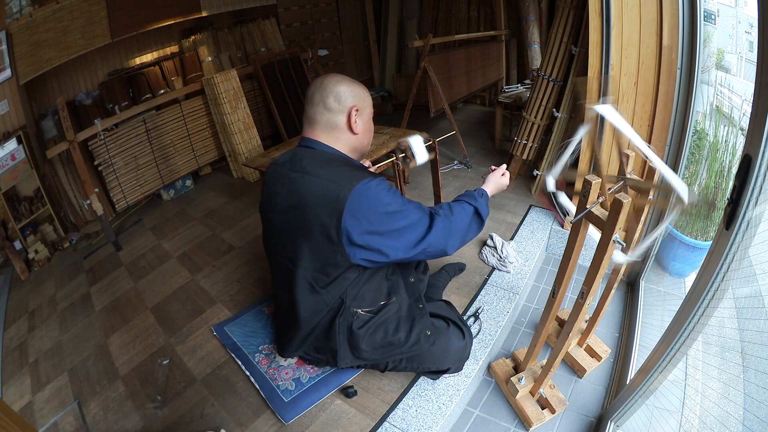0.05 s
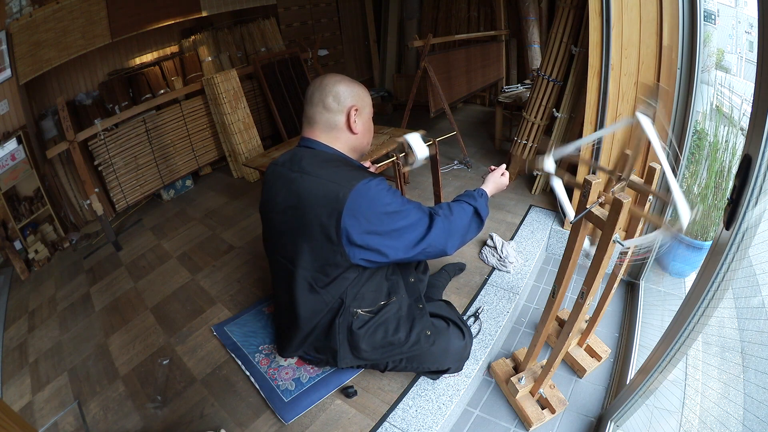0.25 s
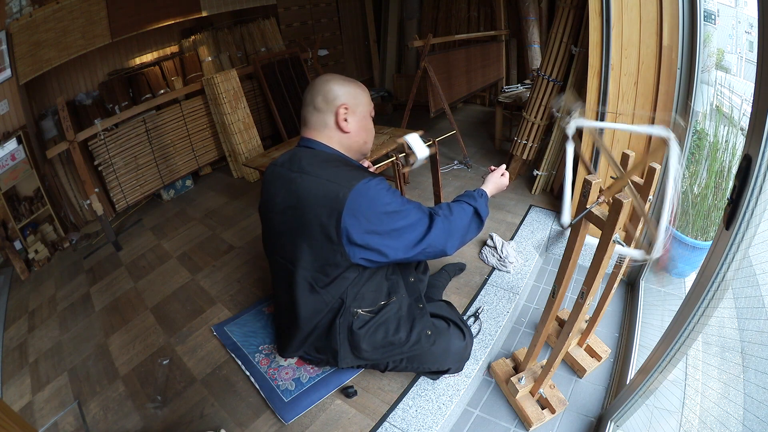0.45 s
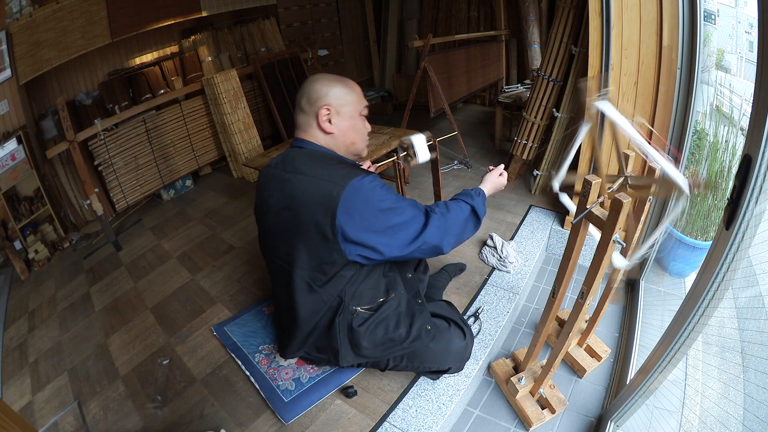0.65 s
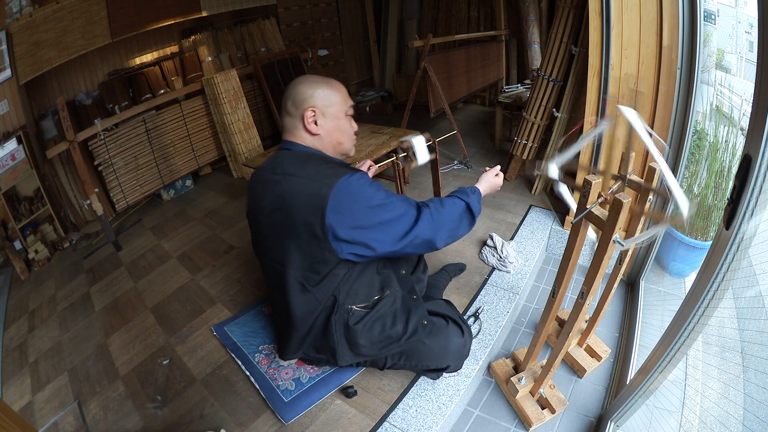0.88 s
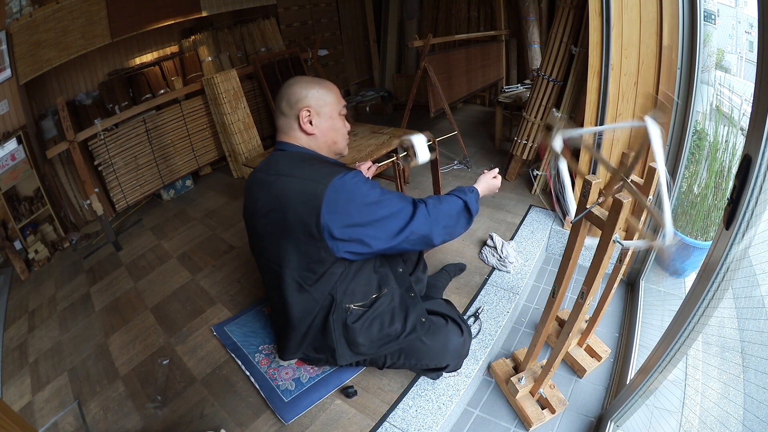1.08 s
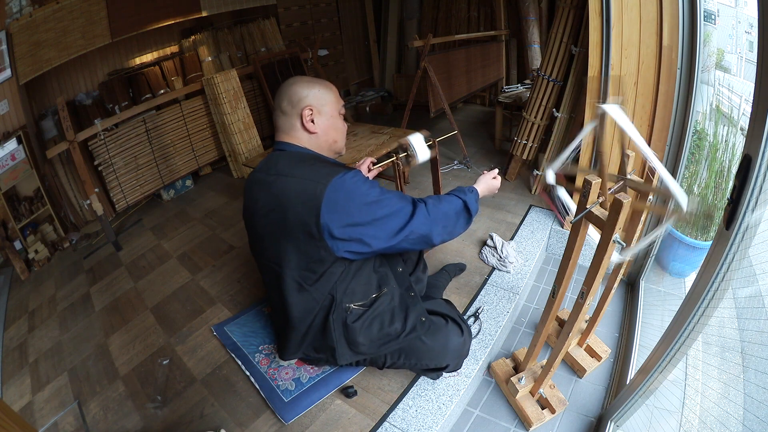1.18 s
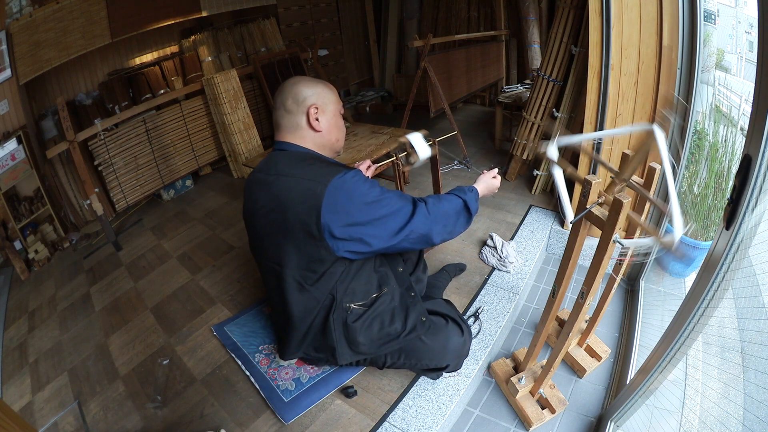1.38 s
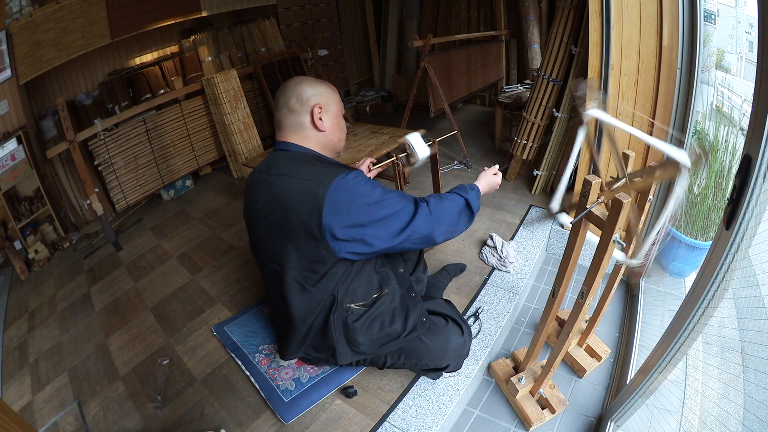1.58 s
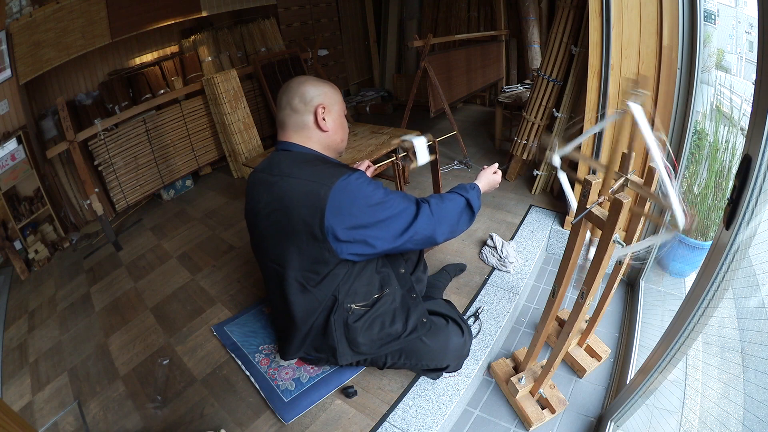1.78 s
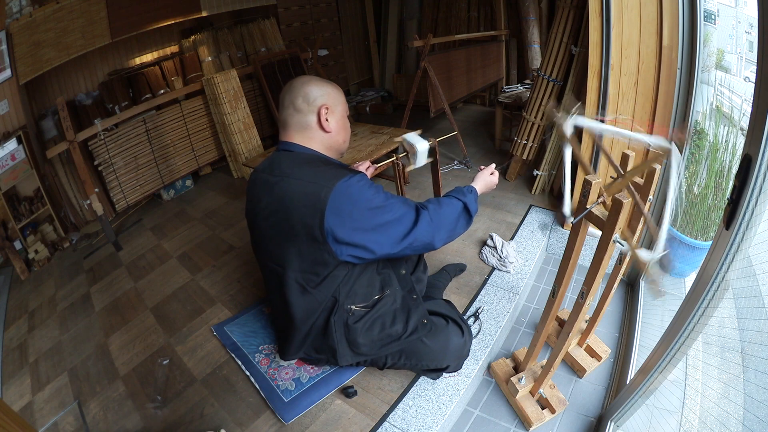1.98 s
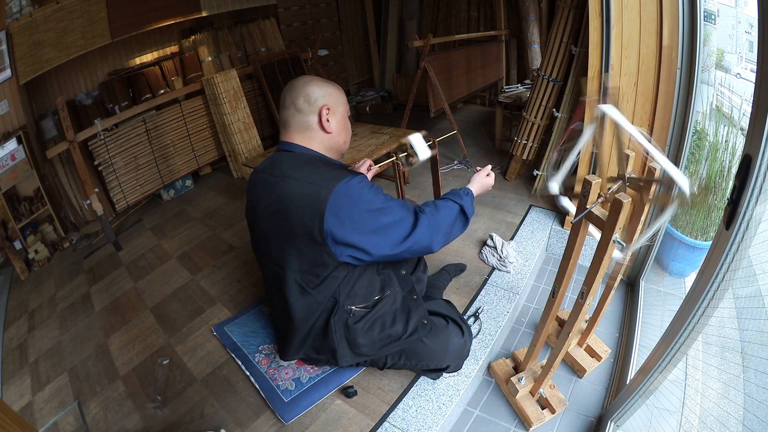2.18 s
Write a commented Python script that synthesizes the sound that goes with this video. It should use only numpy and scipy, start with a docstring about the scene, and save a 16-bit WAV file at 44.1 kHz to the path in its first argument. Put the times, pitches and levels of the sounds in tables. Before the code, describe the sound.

A wooden reel turns on its stand, its loose axle making dull, uneven clacks about four times a second for just over two seconds. A bright click at 0.2 seconds is the loudest sound. Tiny wood squeaks join the clacks near 0.5 and 0.7 seconds. Sliding thread hisses faintly, most from 0.5 to 1 second, over the low rumble and faint drone of a small, quiet workshop.

```python
"""Dull wooden clacks, about four a second, and two bright clicks: a reel turning on its stand.
The loose axle drops in its bearing and rings the stand; harder contacts ring the reel itself.
Dry wood slips with brief squeaks, and the thread hisses faintly as it is wound off.
Behind them lie a faint drone and the low rumble of a quiet workshop."""
import sys
import numpy as np
from scipy import signal
from scipy.fft import rfft, irfft
from scipy.io import wavfile
from scipy.ndimage import uniform_filter1d

SR = 44100
rng = np.random.default_rng(int(sys.argv[2]) if len(sys.argv) > 2 else 0)


def output_pcm(signal):
    """Save a mono or channel-first signal as 16-bit PCM at the path in sys.argv[1].

    Samples are clipped to [-1, 1] before scaling.
    """
    pcm = np.clip(np.atleast_2d(signal).T, -1, 1) * 32767
    wavfile.write(sys.argv[1], SR, np.round(pcm).astype(np.int16))


N = 99225

# stereo likeness of hiss and rumble (frequency [Hz], left-right correlation [-])
NOISE_CORRELATION = [(30, 0.98), (140, 1), (300, 0.89), (600, 0.67), (1500, 0.43), (4000, 0.64),
                     (12000, 0.79)]


def axle_clacks(level_db=-18, t60_s=0.015):
    """The axle drops or rolls over in its bearing with a quick, dull rattle that rings the stand."""
    # (time [s], level [dB], tilt [dB/octave], rise [s])
    drops = [(.1000, -6, -5.5, 0.0035), (.455, -1.5, 0, 0.00067), (.468, -7, -1, 0.0056),
             (0.6883, -1.5, -3.5, 0.00055), (0.713, -7, -2.5, 0.0034), (0.9253, -0.5, -3, 0.0012),
             (1.0945, -8.5, -1.5, 0.0041), (1.1290, 1, 0, 0.00036), (1.1444, -2.5, -1.5, 0.0082),
             (1.3100, 0.5, -1.5, 0.00063), (1.508, -10, -4.5, 0.0043), (1.7079, -1.5, -3, 0.0013),
             (1.9665, -8, -2.5, .003), (2.061, -13, -7, .003), (2.1947, 0.5, -0.5, 0.00094)]
    # contacts within one drop (delay [s], level [dB])
    bounces = [(0, -8.5), (.002, -1.5), (.0052, -13.5)]
    # contact spectrum (frequency [Hz], density [dB])
    spectrum = [(25, -36), (100, -26), (330, -21), (550, -8), (800, -8.5), (1200, -4.5), (2200, 1.5),
                (3200, 1), (4500, -6.5), (6400, -9), (9000, -21), (16000, -44)]
    # (frequency [Hz], level [dB], t60 [s])
    stand_modes = [(554, -5, .14), (824, -8, .2), (1160, -2, .32), (1470, -5, .18), (2070, 1, .24),
                   (2290, -2, .18), (2680, 0, .14), (3080, -2, .13), (3380, -2, .13)]
    out = np.zeros((2, N))
    for time_s, db, tilt, rise_s in drops:
        rattle = np.zeros((2, SR // 3))
        for delay_s, bounce_db in bounces:
            add(rattle, delay_s, amp(bounce_db) * contact(rise_s, hold_s=rise_s, t60_s=t60_s))
        clack = knock(rattle, spectrum, tilt, stand_modes, ring_db=-1.5, room_db=1)
        add(out, time_s, amp(level_db + db) * clack)
    return out


def reel_clicks(level_db=4.5):
    """Single hard, bright contacts ring the reel."""
    # (time [s], level [dB], tilt [dB/octave])
    strikes = [(0.2108, 0, 0.5), (0.4588, -21, -2)]
    # contact spectrum (frequency [Hz], density [dB])
    spectrum = [(25, -48), (100, -24), (220, -13.5), (380, -15.5), (550, -9.5), (800, -9), (1150, -7.5),
                (1600, -8), (2600, -0.5), (4200, -2), (5300, -4), (6200, -0.5), (7200, -15.5), (10000, -22),
                (16000, -48)]
    # (frequency [Hz], level [dB], t60 [s])
    reel_modes = [(212, -11, .25), (560, -8, .13), (1152, -6, .2), (1384, -5, .08), (1892, -2, .11),
                  (2456, -1, .12), (2508, 1, .14), (2612, -1, .12), (2751, -1, .12), (3001, 0, .13),
                  (3054, -3, .12), (4340, -5, .12), (6114, 0, .11), (6203, -4, .15)]
    out = np.zeros((2, N))
    for time_s, db, tilt in strikes:
        blow = contact(rise_s=0.001, hold_s=0.0035, t60_s=0.017)
        click = knock(blow, spectrum, tilt, reel_modes, ring_db=-4, room_db=-4)
        add(out, time_s, amp(level_db + db) * click)
    return out


def contact(rise_s, hold_s, t60_s, correlation=0.88, size=14000):
    """Wood on wood: a noise burst stands for crowded, heavily damped resonances."""
    t = np.arange(size) / SR
    mid, side = rng.choice([-1., 1.], (2, size))
    noise = np.sqrt(1 + correlation) * mid + np.sqrt(1 - correlation) * np.array([side, -side])
    fading_s = np.maximum(t - hold_s, 0)
    envelope = np.minimum(t / rise_s, 1) * amp(-60 * fading_s / t60_s)
    return unit_energy(whiten(noise * envelope) * (fading_s < 2 * t60_s))


def knock(blow, spectrum, tilt, modes, ring_db, room_db, ring_rise_s=0.00067, spread_turns=0.088):
    """A coloured blow, the modes it sets ringing, and the room's answer."""
    # (delay [s], level [dB])
    wall_echoes = [(0.0102, -14), (0.019, -13), (.0235, -22), (.0355, -22), (.0655, -26)]
    t = np.arange(blow.shape[1]) / SR
    ring = 0
    for hz, db, t60_s in modes:
        phase_turns = rng.random() + spread_turns * min(hz / 1000, 1) * rng.standard_normal((2, 1))
        ring = ring + amp(db - 60 * t / t60_s) * np.sin(2 * np.pi * (hz * t + phase_turns))
    ring = unit_energy(ring * np.minimum(t / ring_rise_s, 1))
    direct = unit_energy(colour(blow, spectrum, tilt))
    reverb = unit_energy(colour(room_response()[:, :len(t)], spectrum, tilt))
    out = direct + amp(ring_db) * ring + amp(room_db) * reverb
    for delay_s, db in wall_echoes:
        skewed_right = np.roll(direct[1], rng.integers(-2, 3))
        add(out, delay_s, amp(db) * np.array([direct[0], skewed_right]))
    return out


def wood_squeaks(rise_s=0.0017, waver_depth=0.014, size=8000):
    """Dry wood slips and sings for an instant at an unsteady pitch."""
    # (time [s], pitch [Hz], level [dB], t60 [s])
    slips = [(0.4573, 3890, -18.5, .045), (.4585, 6240, -19, 0.015), (.466, 2355, -14, 0.084),
             (0.715, 1738, -19, 0.082)]
    out = np.zeros((2, N))
    t = np.arange(size) / SR
    for time_s, hz, db, t60_s in slips:
        waver = uniform_filter1d(rng.standard_normal(size), 60)
        pitch_hz = hz * (1 + waver_depth * waver / waver.std())
        phase_turns = np.cumsum(pitch_hz) / SR + 0.08 * rng.standard_normal((2, 1))
        envelope = np.minimum(t / rise_s, 1) * amp(-60 * t / t60_s)
        add(out, time_s, amp(db) * unit_energy(np.sin(2 * np.pi * phase_turns) * envelope))
    return out


def thread_hiss(grain_db=1):
    """Sliding thread gives a grainy hiss."""
    # (time [s], level [dB])
    levels = [(0, -64), (.35, -67.5), (0.498, -57), (.66, -59.5), (1.0, -57), (1.15, -63.5), (1.35, -65.5),
              (1.8, -63.5), (2.25, -68)]
    # (frequency [Hz], density [dB])
    spectrum = [(300, -21), (1200, -1.5), (3500, 3), (7000, 2), (10000, -7), (16000, -17)]
    grain = uniform_filter1d(rng.standard_normal(N), 30)
    noise = stereo_noise(NOISE_CORRELATION, N) * amp(grain_db * grain / grain.std())
    return follow_level(colour(noise, spectrum), levels)


def low_drone(centre_hz=201.5, width_hz=38):
    """One narrow low resonance, driven by noise."""
    # (time [s], level [dB])
    levels = [(0, -65), (.9, -65.5), (1.25, -65.5), (1.5, -64.5), (2.25, -57)]
    hz = np.fft.rfftfreq(N, 1 / SR)
    resonance = 1 / (1 + (2 * (hz - centre_hz) / width_hz) ** 2)
    return follow_level(irfft(rfft(rng.standard_normal(N)) * resonance, N), levels)


def room_response(predelay_s=0.007, early_db=3.5, early_s=0.025, size=16384):
    """Small workshop: dense early reflections, then a short tail that loses its treble first."""
    # (frequency [Hz], t60 [s])
    decay = [(200, 0.37), (700, 0.31), (1800, 0.3), (3000, 0.29), (5000, 0.26), (12000, 0.21)]
    # (frequency [Hz], level [dB])
    spectrum = [(200, 2.5), (1000, 8.5), (2800, 1), (4500, -8), (6500, -7), (12000, -1.5)]
    # (frequency [Hz], left-right correlation [-])
    correlation = [(100, .98), (220, 0.97), (350, 1), (600, 0.17), (1500, 0.53), (4000, .55), (12000, 0.97)]
    hz, t, bins = signal.stft(stereo_noise(correlation, size), SR, nperseg=256)
    envelope_db = early_db * np.exp(-t / early_s) - 60 * t / at_hz(decay, hz)[:, None]
    tail = signal.istft(bins * amp(at_hz(spectrum, hz)[:, None] + envelope_db), SR, nperseg=256)[1]
    return np.pad(tail, ((0, 0), (round(predelay_s * SR), 0)))


def room_air(level_db=-52, patch_db=1.5):
    """Low rumble and soft hiss of the room, drifting in patches."""
    # (frequency [Hz], density [dB])
    spectrum = [(20, -50), (32, -25), (50, -11.5), (80, -1.5), (135, 2), (205, -4.5), (270, -9.5),
                (450, -9), (900, -12.5), (1500, -14.5), (3000, -21), (6500, -28), (10000, -32.5),
                (15500, -42)]
    hz, t, bins = signal.stft(stereo_noise(NOISE_CORRELATION, N), SR, nperseg=2048, noverlap=1536)
    drift = uniform_filter1d(rng.standard_normal((len(t), len(hz))), size=6, axis=0)
    patches = uniform_filter1d(drift, size=16, axis=1).T
    bins = bins * amp(at_hz(spectrum, hz)[:, None] + patch_db * patches / patches.std())
    air = signal.istft(bins, SR, nperseg=2048, noverlap=1536)[1][:, :N]
    return amp(level_db) * air / air.std()


def amp(db):
    return 10 ** (np.asarray(db) / 20)


def at_hz(table, hz):
    """Interpolates on a log frequency axis."""
    knots_hz, values = np.transpose(table)
    return np.interp(np.log(hz + 1), np.log(knots_hz + 1), values)


def unit_energy(x):
    """Scales to a mean energy of 1 per channel."""
    return x / np.sqrt(np.mean(np.sum(x ** 2, -1)) + 1e-20)


def follow_level(x, levels):
    """Normalises, then applies a level curve."""
    return x / x.std() * amp(np.interp(np.arange(N) / SR, *np.transpose(levels)))


def add(mix, time_s, sound):
    """Mixes a sound in place."""
    part = mix[:, max(round(time_s * SR), 0):][:, :sound.shape[1]]
    part += sound[:, :part.shape[1]]


def colour(x, spectrum, tilt_db_per_octave=0, pivot_hz=2500, size=2048):
    """Causal filter from a spectrum, tilted above 500 Hz."""
    hz = abs(np.fft.fftfreq(size, 1 / SR))
    octaves = np.log2(np.maximum(hz, 500) / pivot_hz)
    log_gain = np.log(amp(at_hz(spectrum, hz) + tilt_db_per_octave * octaves))
    minimum_phase = np.exp(np.conj(signal.hilbert(log_gain)))
    taps = np.fft.ifft(minimum_phase).real[:size // 2]
    return signal.fftconvolve(x, taps[None], axes=1)[:, :x.shape[1]]


def stereo_noise(correlation, size):
    """White noise with frequency-dependent left-right correlation."""
    mid, side = rfft(rng.standard_normal((2, size)))
    alike = np.clip(at_hz(correlation, np.fft.rfftfreq(size, 1 / SR)), -1, 1)
    mid, side = mid * np.sqrt((1 + alike) / 2), side * np.sqrt((1 - alike) / 2)
    return irfft(np.array([mid + side, mid - side]), size)


def whiten(burst, width_bins=128):
    """Levels chance spectral peaks, keeping the burst's timing."""
    bins = rfft(burst)
    power = uniform_filter1d((abs(bins) ** 2).mean(0), width_bins)
    return irfft(bins / np.sqrt(abs(power) + 1e-12), burst.shape[1])


def scene():
    """Reel, thread and room together."""
    return reel_clicks() + axle_clacks() + wood_squeaks() + thread_hiss() + low_drone() + room_air()


def record(dry):
    """Steep low-pass band limit."""
    cutoff_hz = 15800
    taps = signal.firwin(511, cutoff_hz, window=("kaiser", 9), fs=SR)
    return signal.oaconvolve(dry, taps[None], "same")


dry = scene()
out = record(dry)
output_pcm(out)
```